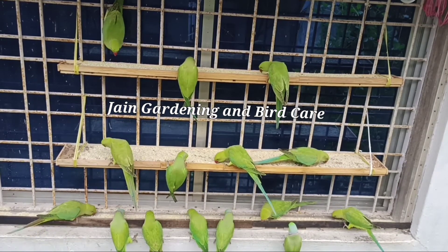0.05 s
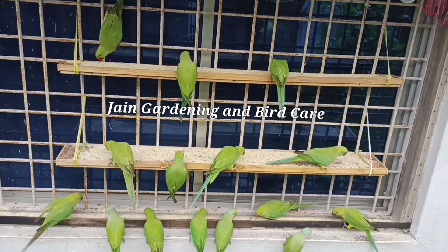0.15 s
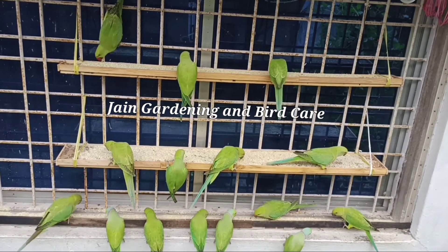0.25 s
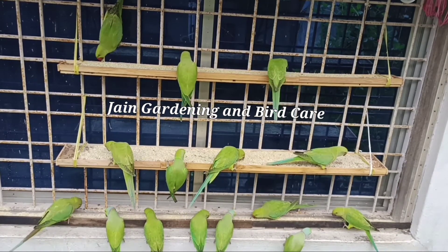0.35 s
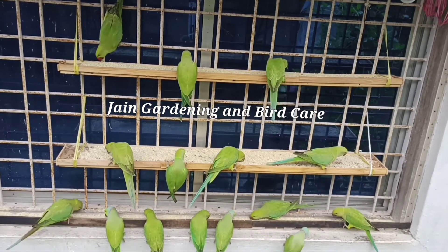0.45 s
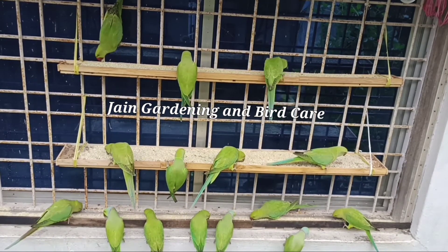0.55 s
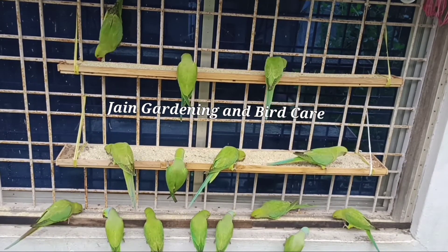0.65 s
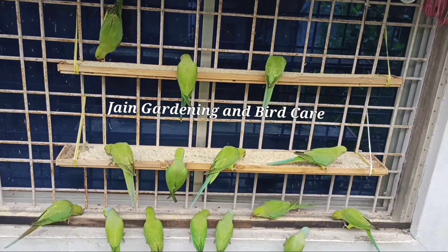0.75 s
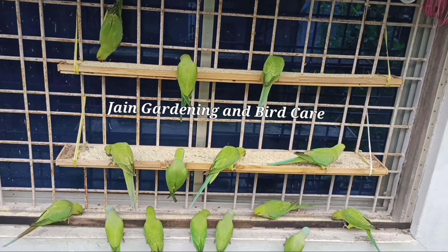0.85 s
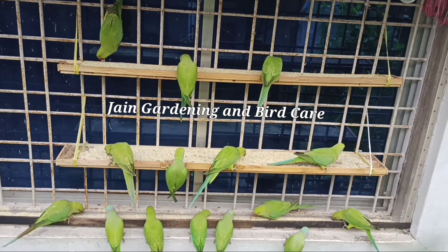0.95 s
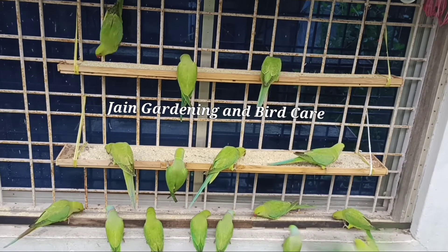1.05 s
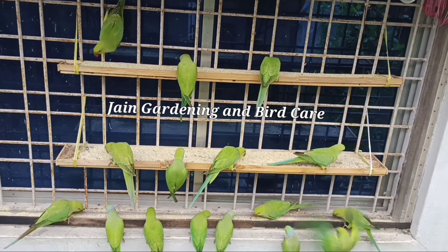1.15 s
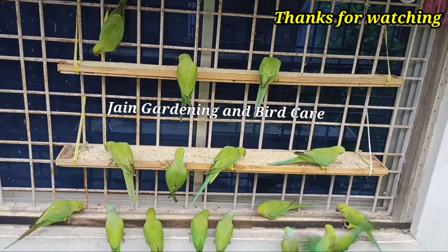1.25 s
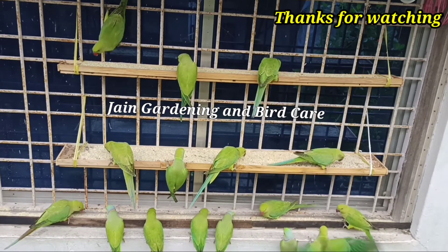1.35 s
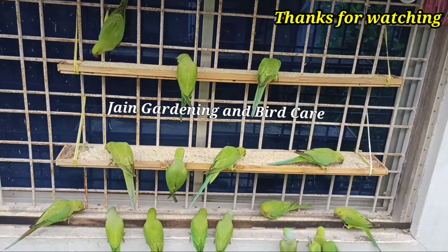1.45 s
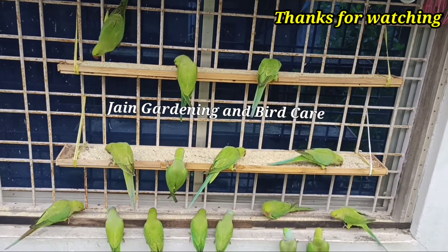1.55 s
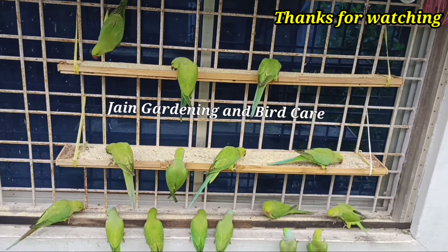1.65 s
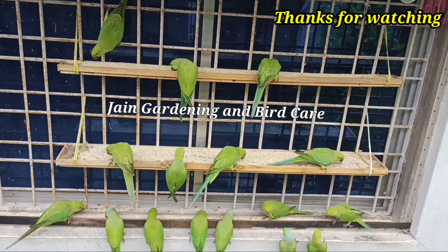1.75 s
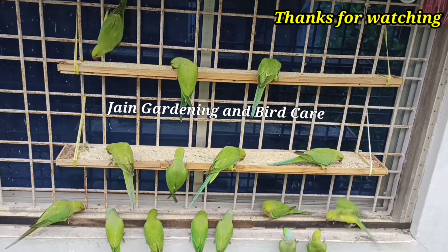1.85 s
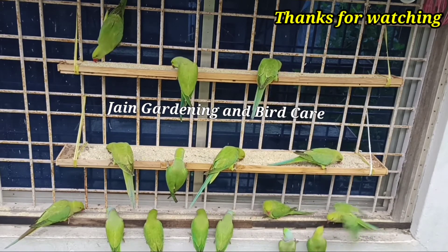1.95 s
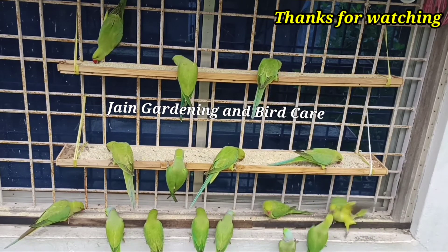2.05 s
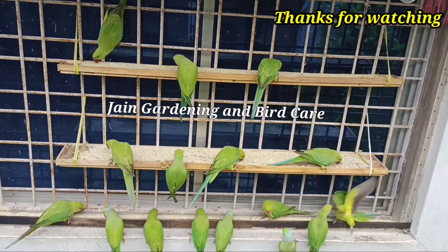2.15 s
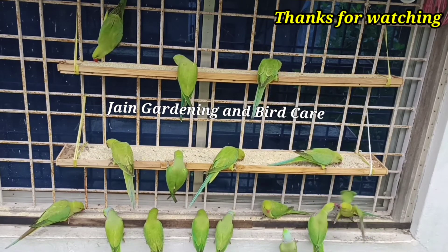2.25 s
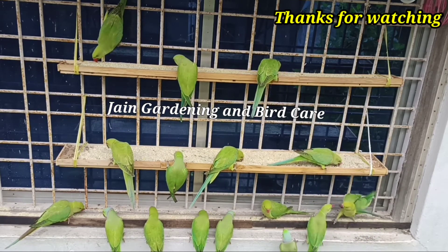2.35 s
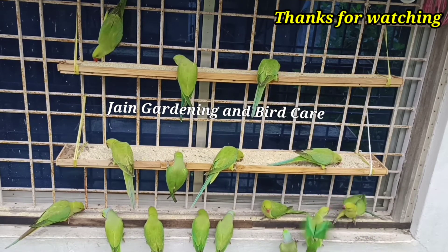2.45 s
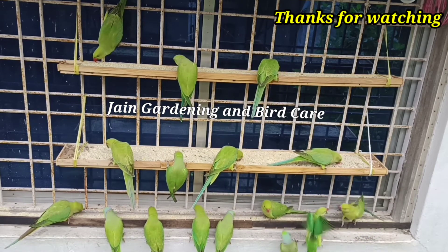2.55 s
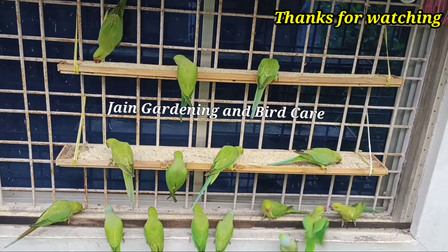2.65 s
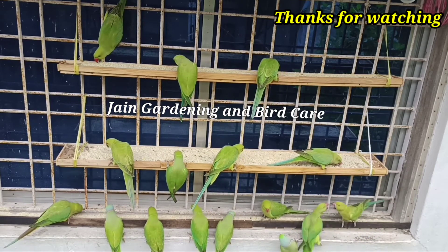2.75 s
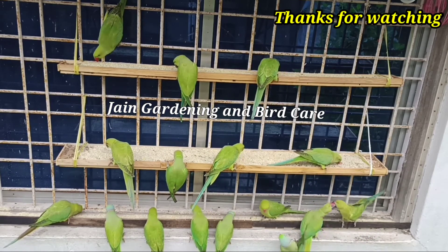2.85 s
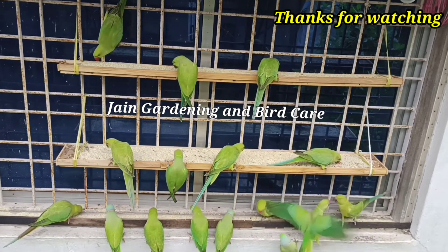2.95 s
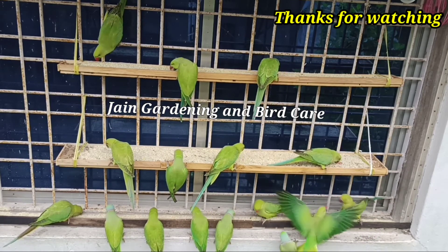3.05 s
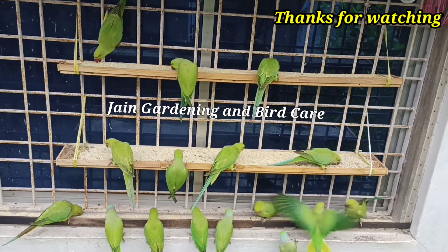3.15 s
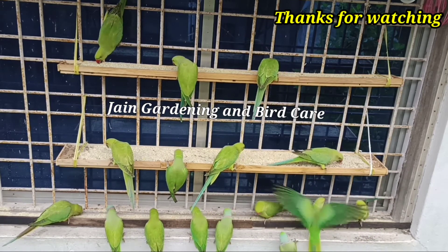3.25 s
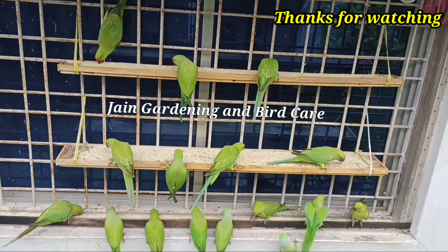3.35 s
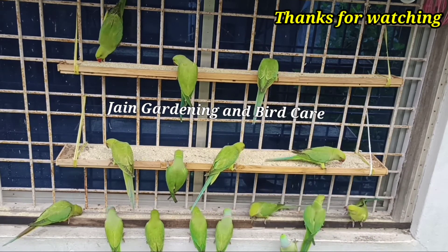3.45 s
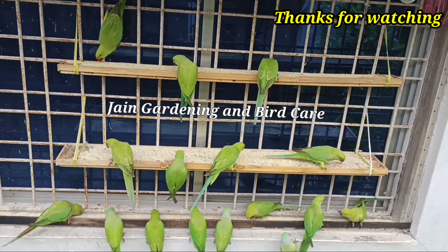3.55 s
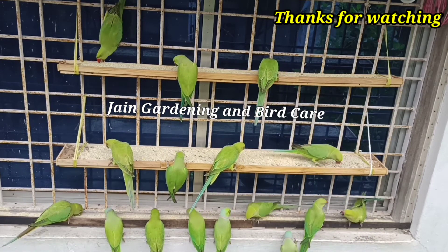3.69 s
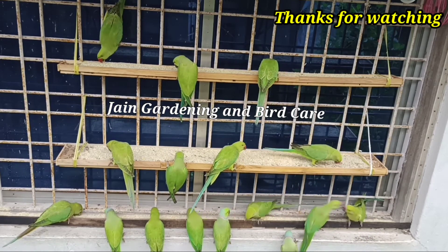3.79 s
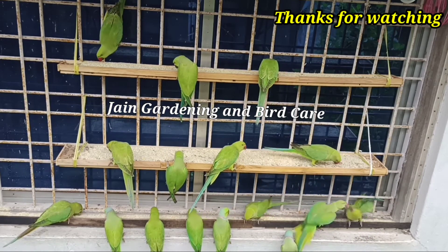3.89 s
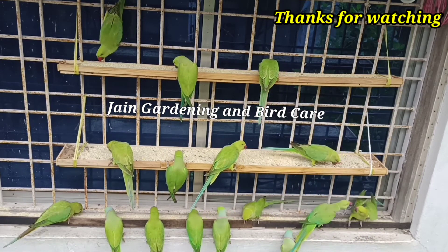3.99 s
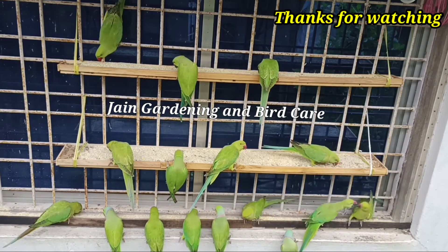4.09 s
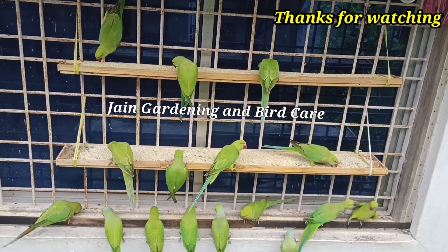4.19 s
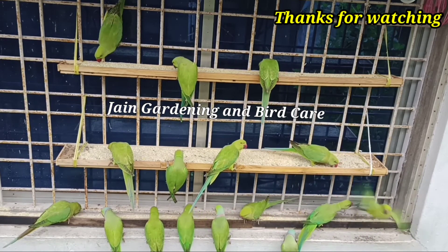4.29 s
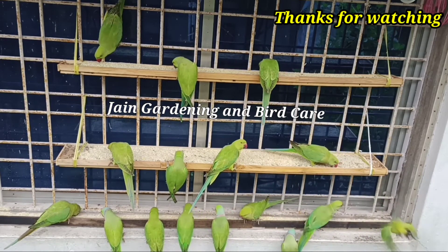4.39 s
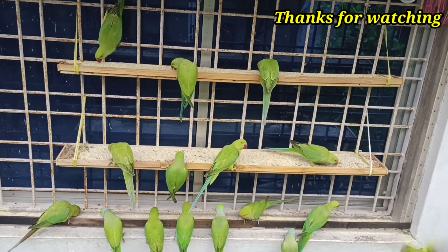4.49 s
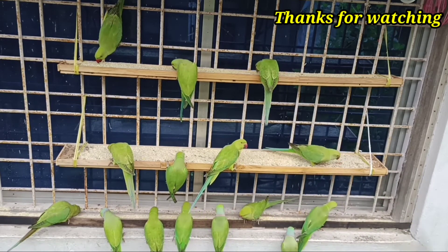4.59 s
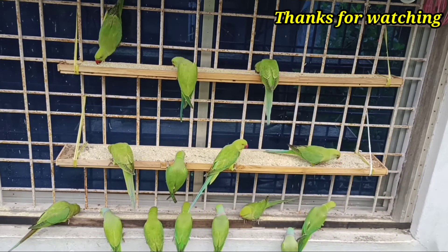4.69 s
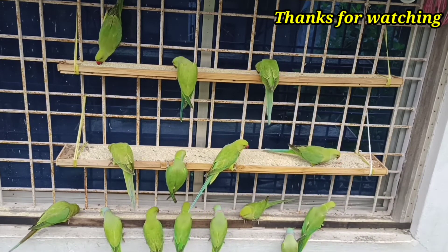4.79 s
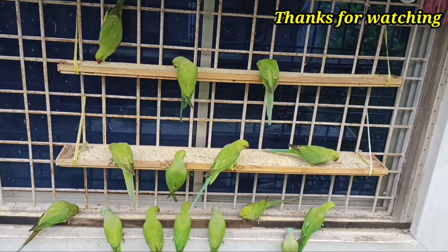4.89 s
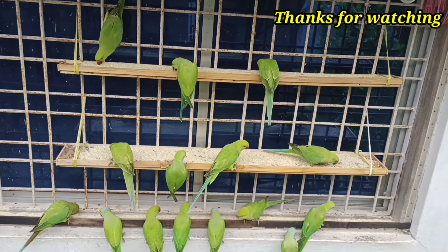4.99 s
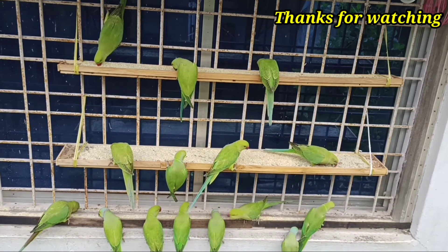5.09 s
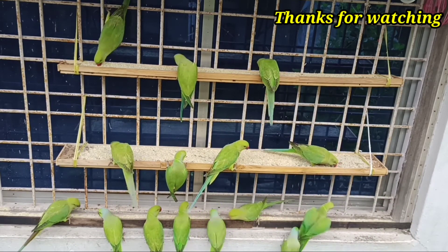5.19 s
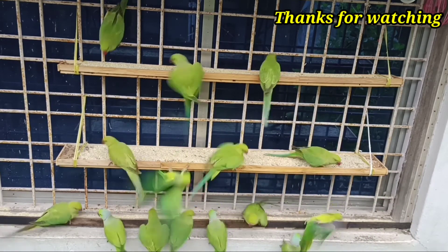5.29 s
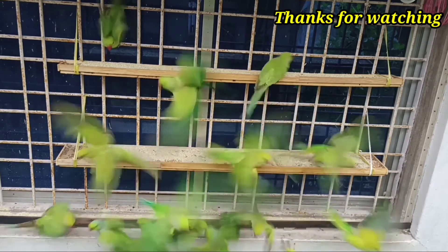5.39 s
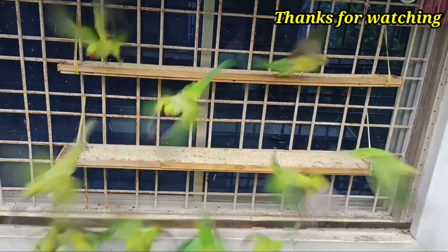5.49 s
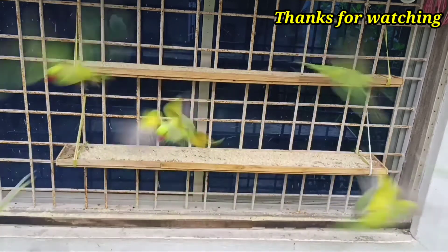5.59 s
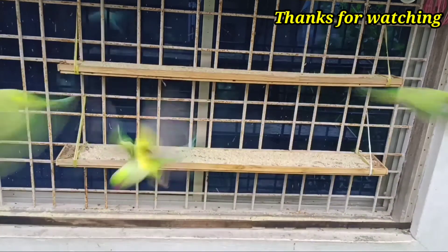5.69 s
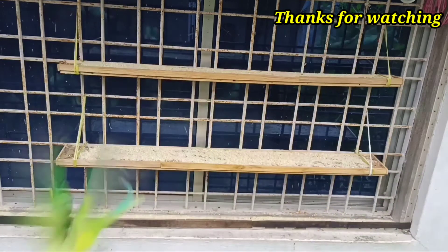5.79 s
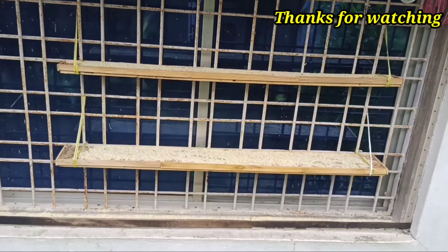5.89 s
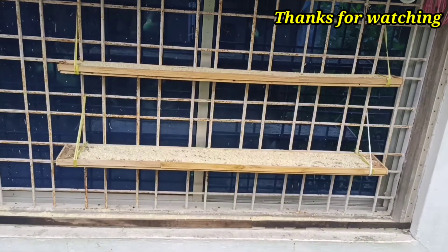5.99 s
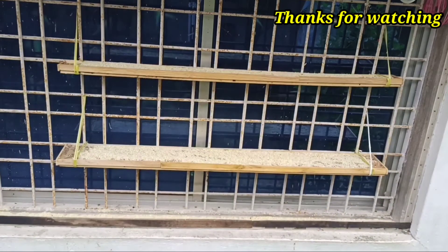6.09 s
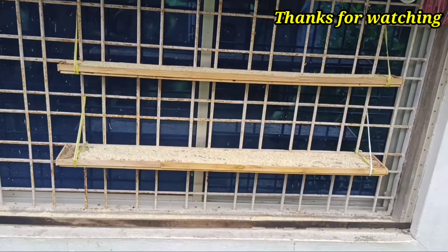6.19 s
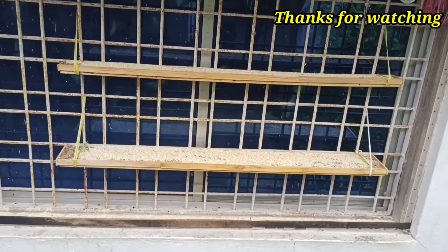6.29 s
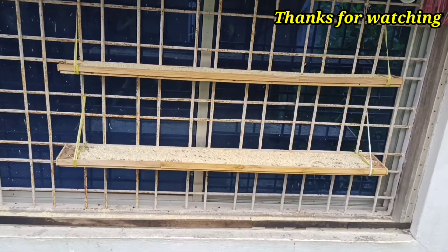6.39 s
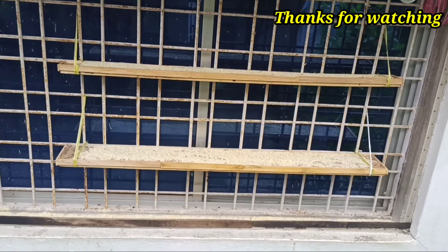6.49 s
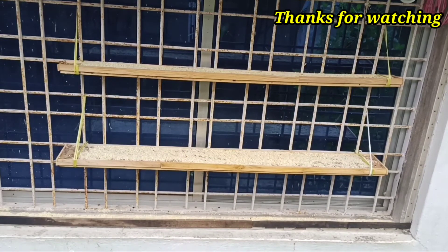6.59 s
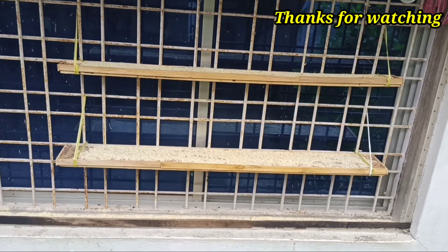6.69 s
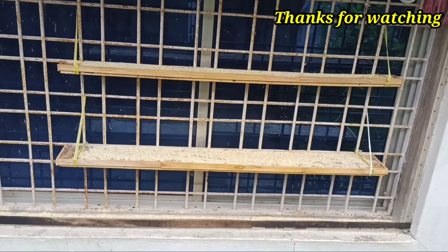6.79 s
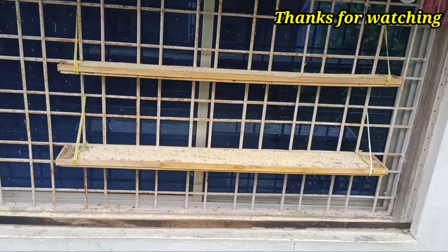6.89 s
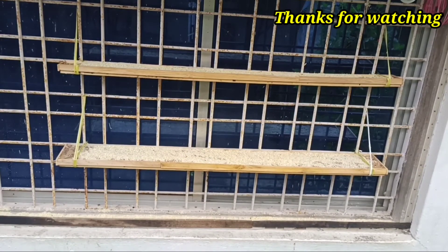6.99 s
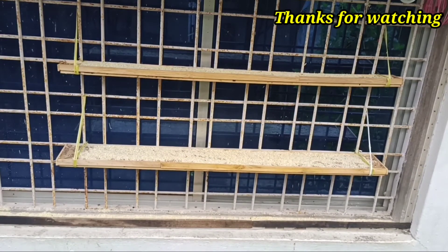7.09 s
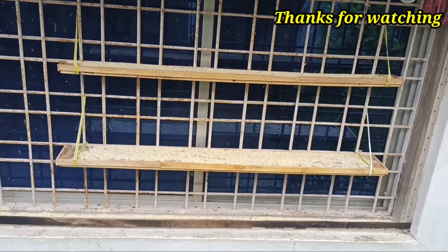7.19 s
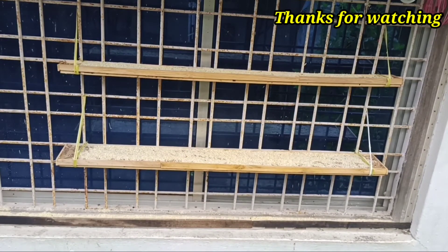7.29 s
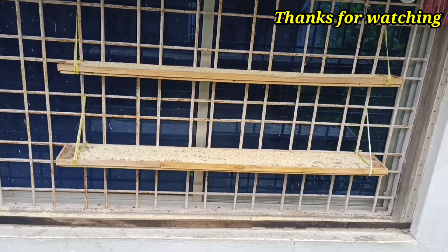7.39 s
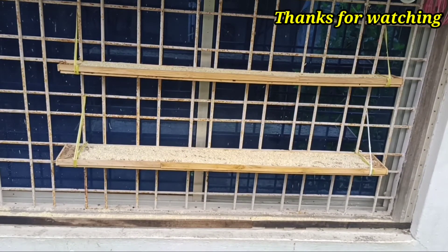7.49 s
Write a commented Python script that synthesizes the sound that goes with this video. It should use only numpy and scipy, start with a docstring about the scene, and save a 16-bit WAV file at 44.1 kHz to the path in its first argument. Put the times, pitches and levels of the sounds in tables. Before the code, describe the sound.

Parakeets feed nearby outdoors, and for the first five seconds their beaks crack seeds in sharp, irregular clicks over faint nibbling and short wing flutters. One bird rasps at about 0.3 seconds, and buzzy rising calls come near 1 and 5 seconds, with a few soft squeaks between. Claws scrape and lightly ring a steel grille around 2.7 and 3.3 seconds. Far off, small birds twitter and a dove coos faintly, around 2 and 4 seconds, over a quiet outdoor rush.

At 5.3 seconds a loud, shrill screech sounds the alarm, and two more follow quickly. The flock bursts into the air at about 5.6 seconds in a roar of beating wings, with close whooshes and sharp wing claps, loudest near 5.8 and 6.5. Two further screeches come just before 7 seconds as the flapping recedes. House walls add a short echo.

```python
"""Parakeets screech in alarm and take off from a window grille in a receding roar of wings.
Each screech is a harmonic source, the syrinx, filtered by the throat; each downstroke drives a pulse of air.
Before the alarm they feed: beaks crack seed, one bird rasps, others call, squeak and flutter, and claws
set the steel ringing in its modes. A dove coos and small birds twitter far off, over a faint outdoor
rush. The house walls reflect the calls and impacts."""
import sys
import numpy as np
from scipy import signal
from scipy.fft import rfft, irfft, next_fast_len
from scipy.io import wavfile
from scipy.ndimage import map_coordinates

SR = 44100
rng = np.random.default_rng(int(sys.argv[2]) if len(sys.argv) > 2 else 0)


def dump_mix(stems):
    """Bounce the given channels to the path in sys.argv[1] as a 16-bit WAV at rate SR."""
    frames = np.atleast_2d(stems).T  # one column per channel
    limited = np.clip(frames, -1, 1)  # hard clip at full scale
    pcm = np.round(limited * 32767).astype(np.int16)
    wavfile.write(sys.argv[1], SR, pcm)


N = 332514
T = np.arange(N) / SR
TOP_HZ = 15800

# Alarm screeches. Each row: start, onset rise and whistle length in seconds, top and end pitch in Hz,
# onset level, whistle level, its change by the end and bark level in dB, whistle roughness from 0 to 1.
SCREECHES = [(5.319, 0.0038, 0.069, 3680, 3230, -4.5, -6, -7.5, -10, 0.03),
             (5.512, 0.011, 0.073, 3520, 2750, -11, -10, -1.5, -11.5, 0.11),
             (5.71, 0.0071, 0.061, 3250, 2754, -13, -14.5, 4, -11, 0.06),
             (6.744, .012, .076, 3310, 2783, -16, -12, -2.5, -16, 0.04),
             (6.946, 0.011, 0.075, 3303, 2630, -19, -16.5, -2.5, -15.5, 0.23)]
# Contact calls. Each row: start, length and climb time in seconds, first and top pitch in Hz, level in dB.
CONTACT_CALLS = [(0.776, 0.15, 0.056, 3190, 4810, -38.5), (0.959, 0.12, .045, 2940, 4550, -27.5),
                 (4.913, 0.071, 0.03, 5550, 5900, -25.5), (4.94, 0.15, 0.028, 3410, 4806, -23)]
# Soft notes. Each row: start and length in seconds, first and last pitch in Hz, level in dB.
SQUEAKS = [(.09, 0.03, 551, 576, -36), (2.38, 0.039, 1920, 1660, -49.5), (3.672, 0.022, 770, 942, -38),
           (3.92, 0.027, 1020, 735, -38.5), (4.194, 0.015, 1570, 1655, -39),
           (4.281, 0.028, 2080, 2390, -38.5), (4.772, 0.011, 1970, 1930, -39)]
COOS = [(2.03, 0.13, 638, 648, -43.5), (2.235, 0.14, 624, 674, -44), (2.395, .075, 664, 608, -45.5),
        (2.505, 0.038, 635, 630, -44.5), (2.62, 0.063, 622, 610, -49), (3.80, 0.284, 470, 497, -52)]
# Resonances of throat and open beak. Each row: centre in Hz, bandwidth in Hz, gain in dB.
RASP_FORMANTS = [(1520, 110, 2), (2860, 710, 3.5), (3700, 110, 1), (5900, 1500, -8), (7450, 540, 5),
                 (10100, 600, -38), (15000, 3100, -11)]
# Vocal tract responses. Each row: frequency in Hz, gain in dB.
ONSET_THROAT = [(500, -19), (1100, -14), (1800, -10), (3200, 1.5), (5000, -1.5), (9000, -15), (16000, -32)]
SCREECH_THROAT = [(500, -49), (1400, -19.5), (1950, -14), (2450, -14.5), (3000, 1), (3800, -0.5), (4900, 1),
                  (5800, -11.5), (7200, -8), (9500, -12.5), (11500, -26.5), (14000, -17.5), (16000, -31)]
CONTACT_THROAT = [(500, -45), (2400, 8), (3100, -3), (3900, 2), (4850, 0.5), (5200, -14), (6000, -2),
                  (8000, -17), (16000, -46)]
CLOSED_BEAK = [(400, 14), (900, 2), (1700, 4.5), (2600, -13.5), (4700, -5), (6000, -27), (12000, -51)]
# The four components of wing noise. Each row: frequency in Hz, level in dB.
AIR_SPECTRUM = [(20, -45), (35, -15), (55, -5), (110, 1), (180, -3), (300, -2.5), (420, -3.5), (650, -8.5),
                (1000, -17), (1500, -28.5), (3000, -50)]
HUM_SPECTRUM = [(110, -48), (200, -10), (275, 0), (320, -6.5), (430, -12.5), (700, -38)]
SWISH_SPECTRUM = [(350, -14), (800, 0.5), (1500, 2.5), (2500, -3), (4500, 0), (7000, -5.5), (12000, -24)]
RUSTLE_SPECTRUM = [(1500, -5), (3500, 0.5), (6000, 1.5), (8500, 5), (11000, -3.5), (12500, -0.5),
                   (14500, 2.5), (16000, 1.5)]
# The flock shuffling and in flight. Each list: air, hum, swish and rustle strength in dB.
IDLE_DB = [-50.5, -65, -63, -60.5]
FLIGHT_DB = [-21, -22, -34.5, -34]
# Bouts of fluttering. Each row: start and length in seconds, air, hum, swish and rustle strength in dB.
FLUTTERS = [(0, 0.23, -40, -40.5, -49.5, -57), (0.332, 0.47, -32.5, -35, -48, -47),
            (.87, 0.24, -44, -46.5, -54, -51.5), (1.08, 0.086, -35, -35, -51, -47.5),
            (1.212, 0.13, -36, -31, -49, -46.5), (1.593, 0.13, -50, -68, -62, -70),
            (2.284, 0.18, -57, -73, -63, -53), (2.74, .04, -41, -51, -52, -52),
            (2.85, 0.35, -47.5, -69, -56, -55.5), (3.23, 0.017, -44, -38, -53, -51),
            (3.348, 0.15, -40.5, -49, -49.5, -47.5), (3.634, 0.44, -45.5, -72, -55.5, -56.5),
            (4.617, .08, -43, -46, -66, -55.5), (4.733, 0.092, -36, -34.5, -50.5, -57),
            (4.976, .07, -33.5, -35.5, -46.5, -46), (5.138, 0.16, -34.5, -35.5, -53.5, -50),
            (5.52, 0.27, -24.5, -30.5, -34.5, -31.5)]
# Near wingbeats. Each row: centre in seconds, whoosh level in dB, feather whistle level in dB.
STROKES = [(2.755, -41, -47), (2.905, -51, -48), (3.05, -55, -45), (3.195, -48, -45), (3.355, -39, -38),
           (3.474, -34, -35), (3.60, -38, -43), (5.27, -36, -45.5), (5.61, -24, -33), (5.691, -22.5, -27.5),
           (5.79, -20, -40), (5.935, -24, -35), (6.049, -40, -45), (6.396, -28.5, -34), (6.49, -26, -37)]
# Wing tip claps. Each row: start in seconds, peak level in dB.
CLAPS = [(5.612, -18), (5.663, -11), (5.8191, -2), (5.9985, -15), (6.0554, -22), (6.3988, -5),
         (6.4881, -2.5), (6.4957, -5), (6.566, -10), (7.256, -20.5)]
# Seed cracks. Each row: start in seconds, peak level in dB, relative weight of the low body in dB.
SEED_CRACKS = [(.4075, -12.5, -19), (.8196, -17.5, -7), (.9485, -24, -11), (1.015, -15, -11),
               (1.1207, -18, -7), (1.2083, -16, -34), (1.2297, -14.5, -27), (1.3857, -18.5, -34),
               (1.5627, -31, -36), (1.673, -27, -17), (2.7534, -21, -14), (2.824, -20, -14),
               (3.071, -22.5, -25), (3.1437, -24, -8), (3.161, -21.5, -21), (3.4264, -22, -13),
               (3.4495, -21, -29), (3.6303, -22, -14), (3.972, -35, -21), (4.353, -24.5, -9),
               (4.395, -33, -17), (4.501, -27.5, -7), (5.091, -18.5, -13)]
# Contact noise of a snap and of a claw on steel. Each row: frequency in Hz, level in dB.
SNAP_SPECTRUM = [(300, 6), (1500, 3), (4000, 2.5), (8500, 0), (11000, 0), (16000, 2.5)]
SCRAPE_SPECTRUM = [(2500, -35), (3800, -2.5), (6000, -8.5), (8500, -4), (11500, 0.5), (14000, 0),
                   (16000, -0.5)]
# Claw strikes. Each row: start in seconds, level in dB, frequency in Hz that the contact point favours.
CLAW_STRIKES = [(2.689, -20, 7720), (3.339, -22.5, 8750)]
# Modes of the grille. Each row: frequency in Hz, level in dB, 60 dB decay time in seconds.
STEEL_MODES = [(3805, -8.5, 0.39), (4328, -11, 0.44), (5130, -14, 0.23), (5800, -12, 0.29),
               (6686, -12, 0.45), (7740, -7, 0.3), (8231, -3, 0.31), (8759, -6, 0.32), (9100, -5, 0.22),
               (10440, -1, 0.16), (12500, -5, 0.13), (13260, -4, 0.15), (14090, 2, .16), (14730, -5, .2),
               (15250, 0, 0.2)]
# Loudness contour of a far twitter. Each row: time in seconds, level in dB.
TWITTER_LEVELS = [(0, -51.5), (1.3, -45), (1.8, -55.5), (2.6, -54), (3.1, -56), (3.7, -47), (4.0, -80)]
# Reverberation of the walls. Each row: frequency in Hz, 60 dB decay time in seconds.
WALL_DECAY = [(200, 0.44), (1000, 0.3), (3500, 0.45), (8000, 0.5), (15000, 0.58)]
# The outdoor rush. Each row: frequency in Hz, level in dB.
OUTDOOR_SPECTRUM = [(25, -13), (60, -6), (160, 17), (300, -3), (550, 5.5), (1000, -3), (2200, -12),
                    (5000, -17), (8000, -34), (11500, -30), (15500, -26)]


def screeches(onset_hz=1130, edge_s=0.0038, bark_hz=2007, bark_s=0.058, bark_fall_hz_per_s=9600):
    """Changes of vibration regime: a harsh onset clears to a sagging whistle, then breaks into a bark."""
    out, t = np.zeros(N), np.arange(-SR // 30, SR // 6) / SR
    for s, rise_s, length, top_hz, end_hz, onset_db, whistle_db, change_db, bark_db, rough in SCREECHES:
        burst = amp(onset_db) * gate(t, hold=0, attack=rise_s, release=0.005)
        onset = burst * rough_voice(np.full(len(t), onset_hz), 0.85, ONSET_THROAT)
        sag = np.clip(t / length, 0, 1) ** 1.2
        scoop = 1 - 0.12 * np.exp(-np.abs(t) / 0.008)  # the whistle slides up to its top
        pitch = (top_hz + (end_hz - top_hz) * sag) * scoop
        held = ramp(t, edge_s) * ramp(length + edge_s / 2 - t, edge_s)
        whistle = held * rough_voice(pitch, rough + 0.21 * sag, SCREECH_THROAT)
        whistle *= amp(whistle_db + change_db * sag)
        age = np.clip(t - length, 0, bark_s)
        bark = rough_voice(bark_hz - bark_fall_hz_per_s * age, 0.35 + 12.4 * age, SCREECH_THROAT)
        bark *= ramp(t - length + edge_s, edge_s) * ramp(bark_s - age, bark_s / 3)
        bark *= amp(bark_db - 196 * age)
        add(out, s + t[0], onset + whistle + bark)
    return out


def rough_voice(pitch, rough, throat, jitter=0.0685, waver=0.0136, shimmer_db=2.5):
    """Jitter and shimmer perturb pitch and amplitude; as roughness grows, noise replaces the tone."""
    rough, n = np.clip(rough, 0, 1), len(pitch)
    shake = jitter * rough * wobble(1100, n) + waver * wobble(352.4, n)
    noise_share = 0.99 * rough ** 1.6
    tone = harmonics(pitch * np.exp(shake), throat)
    shimmer = amp(shimmer_db * wobble(257.4, n))
    return shimmer * (np.sqrt(1 - noise_share) * tone + np.sqrt(noise_share) * noise(throat, n))


def harmonics(pitch, response, count=9):
    """Source and filter: a response curve weights the harmonics of a moving pitch; rms 1."""
    k = np.arange(1, count + 1)[:, None]
    gains = amp(along(response, k * pitch)) * (k * pitch < TOP_HZ)
    waves = np.sin(2 * np.pi * k * np.cumsum(pitch) / SR)
    return np.sum(gains * waves, 0) / np.sqrt(np.sum(gains ** 2, 0) / 2 + 1e-12)


def rasp(start_s=0.2555, rate_hz=119, lead_s=0.027, attack_s=0.004, release_s=0.031):
    """Pulse excitation: uneven noisy puffs ring the formants of throat and beak in a scolding rattle."""
    out, t = np.zeros(N), np.arange(-SR // 25, SR // 7) / SR
    cycle = rate_hz * t + 0.06 * wobble(90, len(t))
    puffs = bell((cycle + 0.5) % 1 - 0.5, 0.15) * rng.standard_normal(len(t))

    def formants(hz):
        return sum(amp(db) * 1j * hz * width / (centre ** 2 - hz ** 2 + 1j * hz * width)
                   for centre, width, db in RASP_FORMANTS)

    soft_lead = amp(-10) * gate(t + lead_s, lead_s, attack_s, release_s)
    effort = np.maximum(soft_lead, gate(t, 0.065, attack_s, release_s))
    level = amp(-19.5 + 0.94 * wobble(112, len(t)))
    add(out, start_s + t[0], effort * level * unit(filtered(puffs, formants)))
    return out


def contact_calls(buzz_hz=330, buzz_depth=0.23, attack_s=0.042, release_s=0.039):
    """Frequency modulation: the pitch climbs to a top and dips from it rapidly, so the call buzzes."""
    out = np.zeros(N)
    for s, length, climb_s, start_hz, top_hz, db in CONTACT_CALLS:
        t = np.arange(0, length, 1 / SR)
        n = len(t)
        climb = 1 - np.exp(-(t / climb_s) ** 2)
        cycle = np.cumsum(buzz_hz * (1 + 0.31 * wobble(400, n))) / SR
        dips = np.abs(np.sin(np.pi * cycle)) ** 4.2 * (1 + 0.243 * wobble(500, n))
        pitch = (start_hz + (top_hz - start_hz) * climb) * (1 - buzz_depth * (1 + climb) / 2 * dips)
        phase = 2 * np.pi * np.cumsum(pitch) / SR
        tone = unit(np.sin(phase) + 0.52 * np.sin(2 * phase))
        swell = np.minimum(t / attack_s, 1) * ramp(length - t, release_s)
        add(out, s, swell * amp(db + 1.5 * wobble(287, n)) * tone)
    return filtered(out, lambda hz: amp(along(CONTACT_THROAT, hz)))


def soft_notes(table, throat, arch):
    """Smooth vibration of the syrinx gives short harmonic notes whose pitch arches between its ends."""
    out = np.zeros(N)
    for s, length, start_hz, end_hz, db in table:
        progress = np.linspace(0, 1, int(length * SR))
        swell = np.abs(np.sin(np.pi * progress))
        glide = start_hz + (end_hz - start_hz) * progress
        pitch = glide * (1 + arch * swell + 0.025 * wobble(162, len(progress)))
        add(out, s, amp(db) * swell ** 0.33 * harmonics(pitch, throat))
    return out


def wings(surge_db=1.1, crackle_db=2.5):
    """Aerodynamic and friction noise: downstrokes push air, hum and swish; rubbing feathers crackle."""
    air, hum, swish, rustle = flock_strength() * amp(surge_db * wobble(13, N))
    beats = wingbeats(rate_hz=11, sharpness=1.3)
    air *= amp(-3) * noise(AIR_SPECTRUM, N)
    hum *= amp(-2) * noise(HUM_SPECTRUM, N)
    swish *= amp(2.5) * noise(SWISH_SPECTRUM, N)
    rustle *= amp(5) * unit(noise(RUSTLE_SPECTRUM, N) * amp(crackle_db * wobble(500, N)))
    return beats * (air + hum + swish + rustle)


def flock_strength(airborne_s=5.647, lift_s=0.096, leave_s=5.84, near_m=2.65, flee_m_per_s=2.19):
    """Shuffling, fluttering and flight add in power; the fleeing flock's amplitude falls as 1/distance."""
    distance = near_m + flee_m_per_s * np.maximum(T - leave_s, 0)
    flight = np.exp(np.minimum(T - airborne_s, 0) / lift_s) * near_m / distance
    power = amp(IDLE_DB)[:, None] ** 2 + np.outer(amp(FLIGHT_DB), flight) ** 2
    for s, length, *db in FLUTTERS:
        power += np.outer(amp(db), gate(T - s, length, attack=0.064, release=0.079)) ** 2
    return np.sqrt(power)


def wingbeats(rate_hz, sharpness, birds=9):
    """Incoherent summation: the downstrokes of birds at separate drifting rates add in power; rms 1."""
    power = np.zeros(N)
    for start, speed in rng.random((birds, 2)):
        rate = rate_hz * (0.7 + 0.6 * speed) * (1 + 0.0745 * wobble(3, N))
        cycle = start + np.cumsum(rate) / SR
        power += np.exp(sharpness * (np.cos(2 * np.pi * cycle) - 1))
    return unit(np.sqrt(power))


def near_strokes(width_s=0.015, whistle_hz=570, rise_per_s=5):
    """Flow over a close wing makes a whoosh and a breathy whistle that rises with wing speed."""
    out, t = np.zeros(N), np.arange(-SR // 16, SR // 16) / SR
    for s, whoosh_db, whistle_db in STROKES:
        pitch = whistle_hz * np.exp(rise_per_s * t + 0.075 * wobble(449, len(t)))
        whistle = harmonics(pitch, [(550, 2.5), (1150, -1.5), (1700, -12), (5000, -28)], count=4)
        whoosh = noise([(40, -34), (150, 3), (350, 1), (900, -5.5), (2000, -15), (6000, -17),
                        (15000, -28)], len(t))
        add(out, s + t[0], bell(t, width_s) * (amp(whoosh_db) * whoosh + amp(whistle_db) * whistle))
    return out


def wing_claps():
    """Impact noise: stiff wing tips snap against each other."""
    out = np.zeros(N)
    for s, db in CLAPS:
        add(out, s, amp(db) * snap(low_db=-1, top_db=-9, t60=0.011))
    return out


def seed_cracks(nibbles=150):
    """Brittle fracture: husks crack loudly over the flock's faint nibbling, which stops at the alarm."""
    out, alarm_s = np.zeros(N), SCREECHES[0][0]
    for s, db, body_db in SEED_CRACKS:
        add(out, s, amp(db) * snap(low_db=body_db + 6, top_db=-6, t60=0.016))
    for when, softness in rng.random((nibbles, 2)):
        level = amp(-32 - 10 * np.sqrt(softness))
        add(out, when * alarm_s, level * snap(low_db=0, top_db=-2.5, t60=0.024))
    return out


def snap(low_db, top_db, t60, ring_hz=8300, ring_db=7, rise_s=0.0004):
    """A damped broadband transient with one resonance, placed anew each time; peak 1."""
    t = np.arange(SR // 25) / SR
    centre = ring_hz * np.exp(0.11 * rng.standard_normal())
    tilt = [(2500, low_db), (7500, 0), (13000, top_db)]
    colour = lambda hz: amp(along(tilt, hz) + ring_db * np.exp(-((hz - centre) / 900) ** 2))
    burst = filtered(noise(SNAP_SPECTRUM, len(t)), colour)
    burst *= amp(-60 * t / t60) * (1 - np.exp(-t / rise_s))
    return burst / np.abs(burst).max()


def grille(scrape_t60=0.18, favour_db=7, rise_s=0.00065):
    """Modal vibration: a claw scrapes a steel bar, and the contact point sets each mode's strength."""
    out, t = np.zeros(N), np.arange(SR // 2) / SR
    for s, db, favoured_hz in CLAW_STRIKES:
        ring = np.zeros(len(t))
        for hz, mode_db, t60 in STEEL_MODES:
            mode_db += rng.normal(0, 1.5) + favour_db * np.exp(-((hz - favoured_hz) / 300) ** 2)
            ring += amp(mode_db - 60 * t / t60) * np.sin(2 * np.pi * hz * t + 0.2 * wobble(205, len(t)))
        scrape = amp(-2 - 60 * t / scrape_t60) * noise(SCRAPE_SPECTRUM, len(t))
        add(out, s, amp(db) * (amp(-9) * ring + scrape) * (1 - np.exp(-t / rise_s)))
    return out


def dove():
    """Low-pass filtering by the throat leaves each coo an almost pure tone."""
    return soft_notes(COOS, [(650, 3), (1300, -24), (2600, -77)], arch=0.0347)


def far_twitter(pitch_hz=7260, notes_per_s=33):
    """A small bird modulates one tone in pitch and amplitude into bursts of quick falling notes."""
    cycle = (np.cumsum(notes_per_s * (1 + 0.291 * wobble(11, N))) / SR) % 1
    pitch = pitch_hz * (1 - 0.06 * (cycle - 0.5) + 0.009 * wobble(200, N))
    trill = np.sin(2 * np.pi * np.cumsum(pitch) / SR) * np.sin(np.pi * cycle) ** 2
    bursts = amp(6 * np.tanh(1.5 * wobble(18, N)))
    return unit(trill * bursts) * amp(np.interp(T, *np.transpose(TWITTER_LEVELS)))


def far_chips(pitch_hz=6330, chips_per_s=7.02, first_s=0.036):
    """Periodic tone pulses: another small bird chips steadily and fades out at the alarm."""
    cycle = (chips_per_s * (T - first_s) + 0.5) % 1 - 0.5
    pitch = pitch_hz * (1 - 0.037 * cycle + 0.0183 * wobble(700, N))
    chips = np.sin(2 * np.pi * np.cumsum(pitch) / SR) * bell(cycle, 0.13)
    return amp(-56) * unit(chips) * np.interp(T, [5.2, 5.5], [1, 0])


def walls(x, wet_db, early=0.33, echoes=8):
    """Early reflections from sill and window precede the walls' short reverberation; unit energy."""
    hz, t, spectra = signal.stft(rng.standard_normal(SR // 2), SR, nperseg=256)
    tail = signal.istft(spectra * amp(-60 * t / along(WALL_DECAY, hz)[:, None]), SR, nperseg=256)[1]
    response = np.pad(amp(wet_db) * tail / np.linalg.norm(tail), (SR // 100, 0))
    for delay, size in rng.random((echoes, 2)):
        response[int((0.002 + 0.025 * delay) * SR)] += early * (size - 0.5)
    response[0] = 1  # the direct sound
    return signal.fftconvolve(x, response / np.linalg.norm(response))[:N]


def amp(db):
    """Decibels as an amplitude ratio."""
    return 10 ** (np.asarray(db) / 20)


def unit(x):
    """x scaled to rms 1."""
    return x / np.sqrt(np.mean(x ** 2) + 1e-20)


def along(points, hz):
    """Interpolation of (Hz, value) points on a logarithmic frequency axis."""
    knots_hz, values = np.transpose(points)
    return np.interp(np.log(hz + 1), np.log(knots_hz + 1), values)


def wobble(rate, n):
    """A smooth random curve with rate knots a second."""
    return map_coordinates(rng.standard_normal(int(n * rate / SR) + 4), [np.arange(n) * rate / SR])


def filtered(x, response):
    """Linear filtering: the spectrum of x times a frequency response."""
    size = next_fast_len(len(x) + 4096)
    return irfft(rfft(x, size) * response(np.fft.rfftfreq(size, 1 / SR)), size)[:len(x)]


def noise(spectrum, n):
    """White noise coloured by (Hz, dB) points; rms 1."""
    return unit(filtered(rng.standard_normal(n), lambda hz: amp(along(spectrum, hz))))


def gate(t, hold, attack, release):
    """Exponential growth to time 0, a hold, then decay; attack and release are time constants."""
    return np.exp(np.minimum(t, 0) / attack - np.maximum(t - hold, 0) / release)


def ramp(t, length):
    """A raised-cosine step from 0 to 1 over length."""
    return np.sin(np.pi / 2 * np.clip(t / length, 0, 1)) ** 2


def bell(x, width):
    """A Gaussian pulse of peak 1."""
    return np.exp(-0.5 * (x / width) ** 2)


def add(track, s, x):
    """Superpose x on the track at s seconds."""
    part = track[max(round(s * SR), 0):][:len(x)]
    part += x[:len(part)]


def scene():
    """Superposition of near and far birds, their reflections and the faint outdoor rush."""
    squeaks = soft_notes(SQUEAKS, CLOSED_BEAK, arch=0.023)
    coos = dove()
    voices = walls(screeches(), wet_db=-6, early=0.11) + walls(rasp() + squeaks, wet_db=-5)
    impacts = walls(seed_cracks() + wing_claps() + grille(), wet_db=-9.5)
    calls = walls(contact_calls(), wet_db=-3.5)
    far_birds = walls(coos + far_twitter() + far_chips(), wet_db=-4.5)
    flight = wings() + walls(near_strokes(), wet_db=-8.5)
    outdoors = amp(-53.5) * noise(OUTDOOR_SPECTRUM, N)
    return (voices + impacts + calls + far_birds + flight + outdoors)[None]


def record(dry):
    """Soft saturation rounds peaks near full scale; a low-pass filter then limits the band."""
    rounded = dry[0] / (1 + np.abs(dry[0]) ** 10) ** (1 / 10)
    return filtered(rounded, lambda hz: hz < TOP_HZ)[None]


dry = scene()
out = record(dry)
dump_mix(out)
```